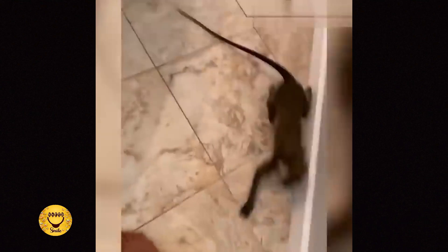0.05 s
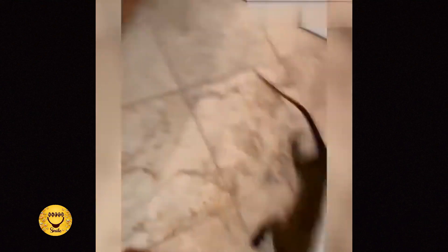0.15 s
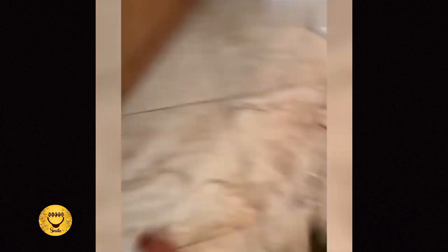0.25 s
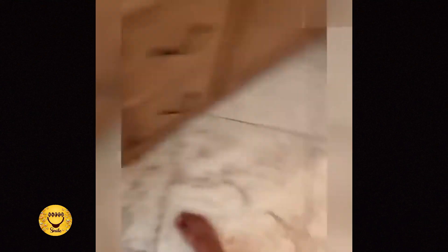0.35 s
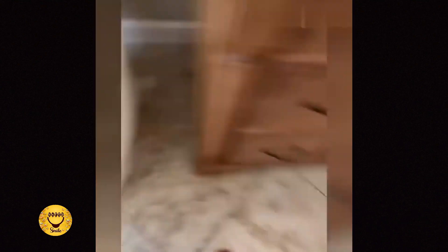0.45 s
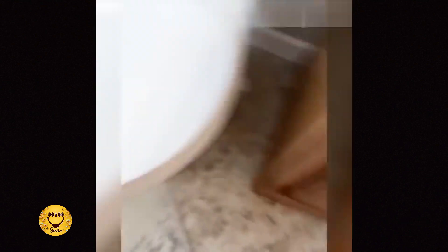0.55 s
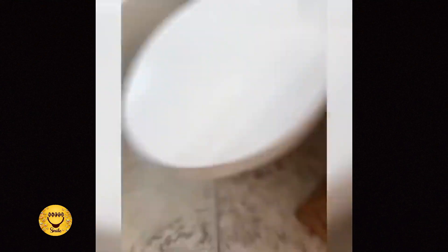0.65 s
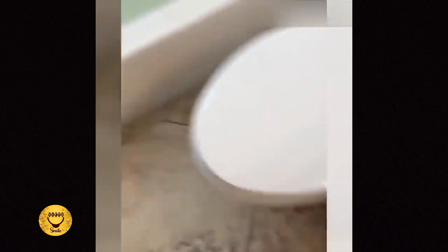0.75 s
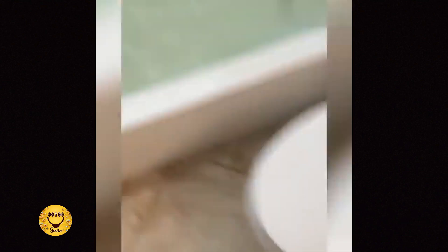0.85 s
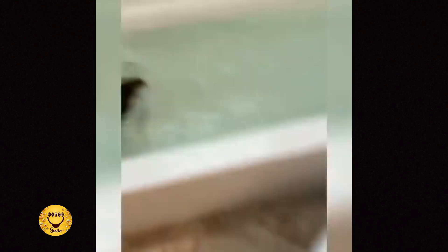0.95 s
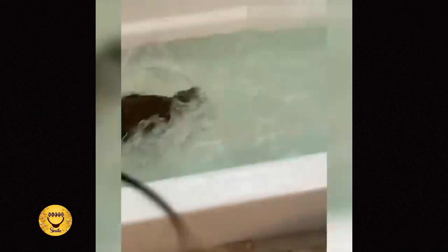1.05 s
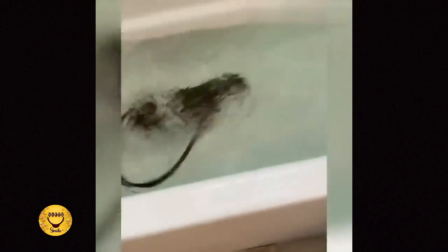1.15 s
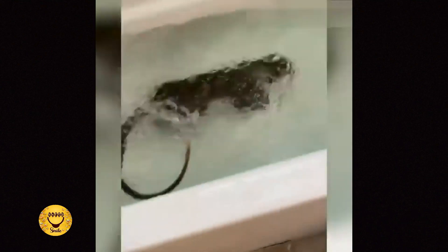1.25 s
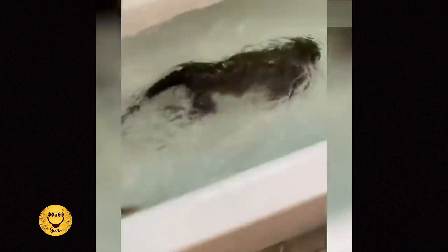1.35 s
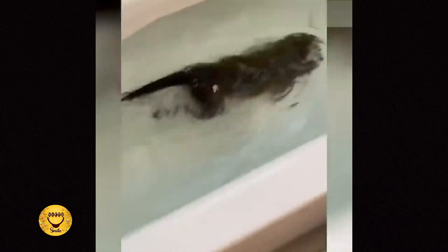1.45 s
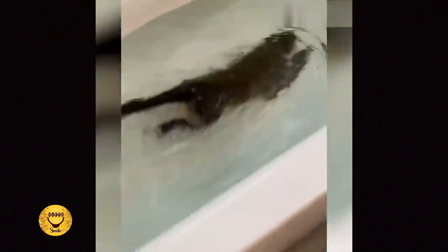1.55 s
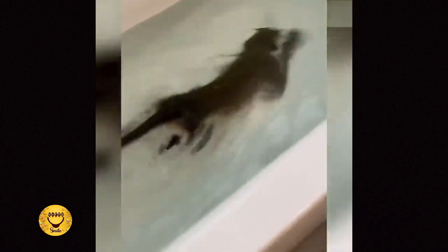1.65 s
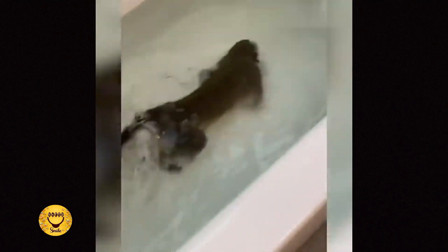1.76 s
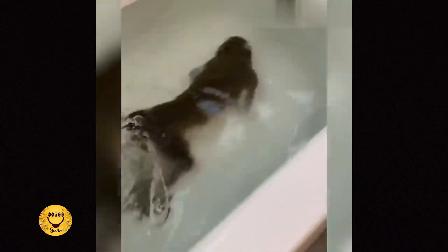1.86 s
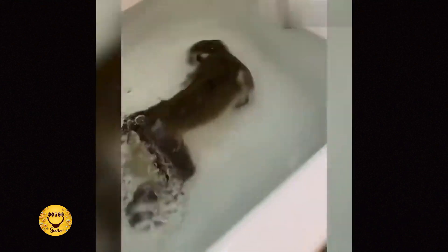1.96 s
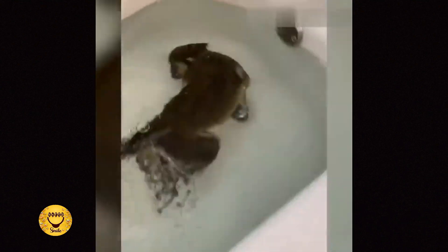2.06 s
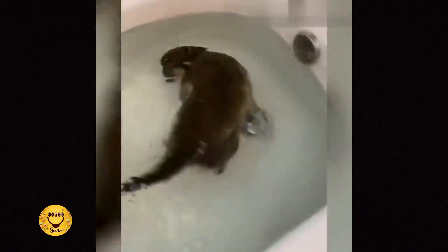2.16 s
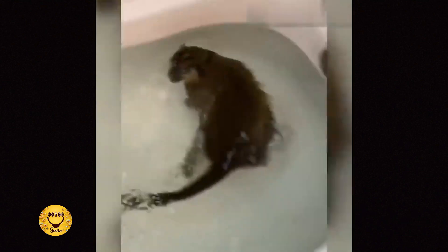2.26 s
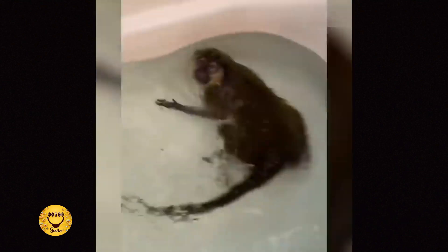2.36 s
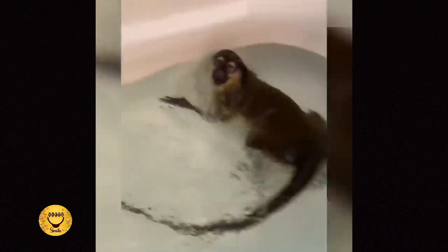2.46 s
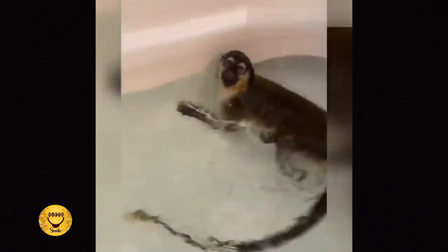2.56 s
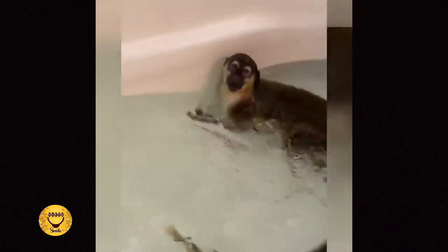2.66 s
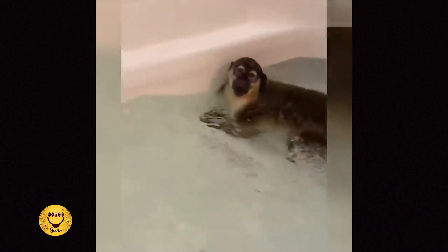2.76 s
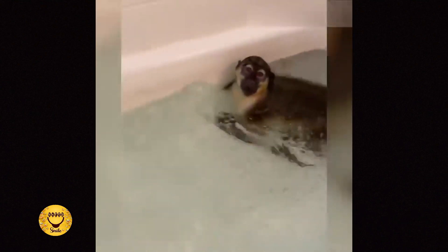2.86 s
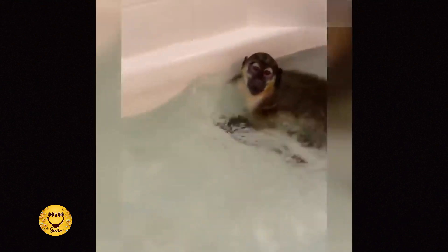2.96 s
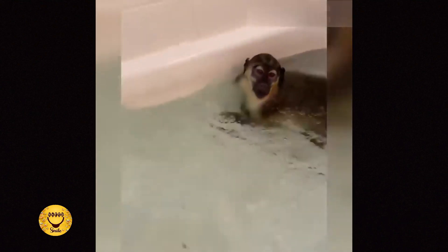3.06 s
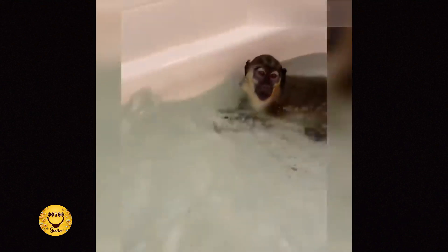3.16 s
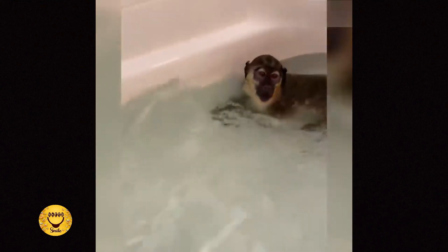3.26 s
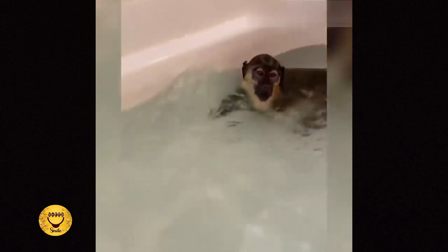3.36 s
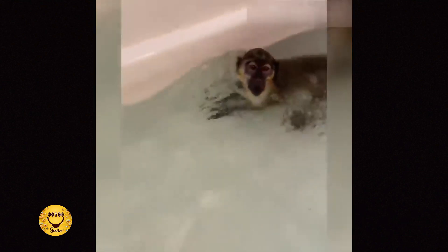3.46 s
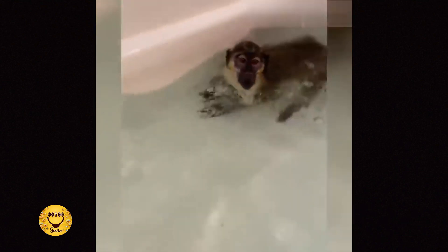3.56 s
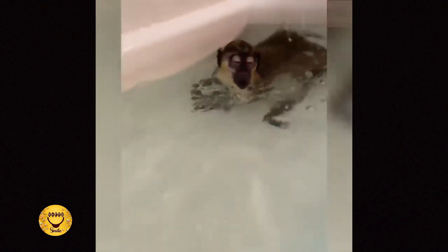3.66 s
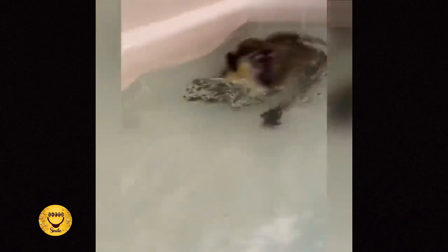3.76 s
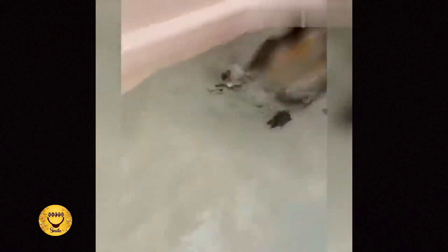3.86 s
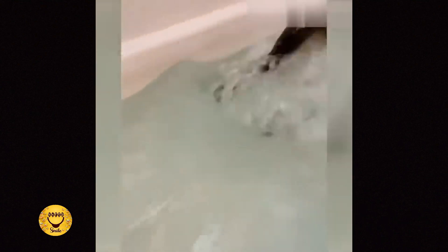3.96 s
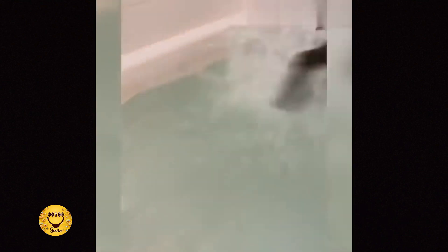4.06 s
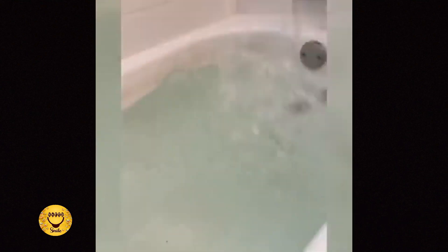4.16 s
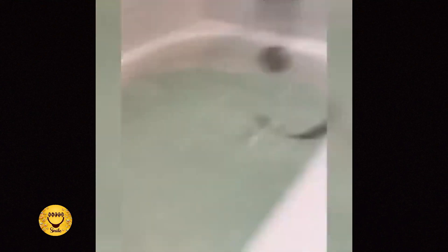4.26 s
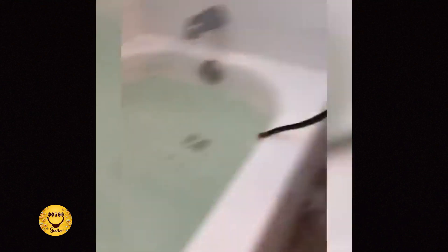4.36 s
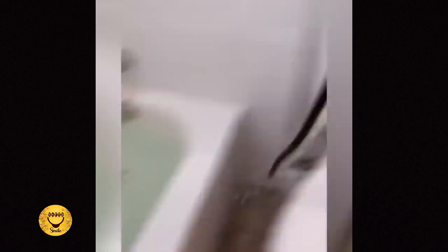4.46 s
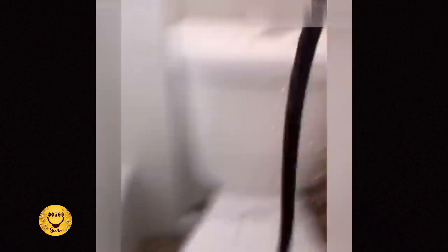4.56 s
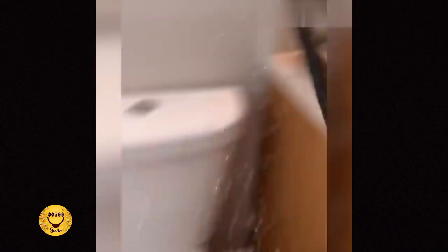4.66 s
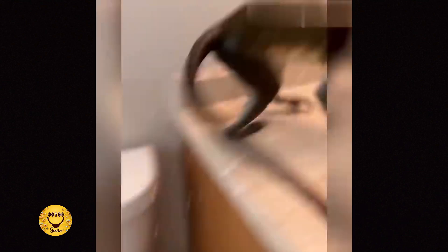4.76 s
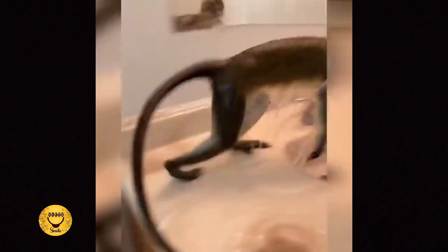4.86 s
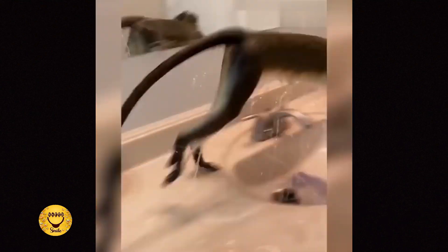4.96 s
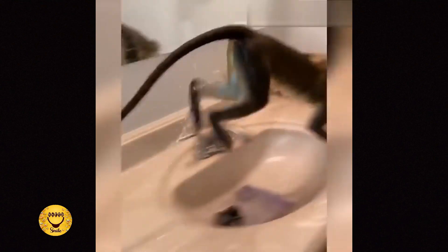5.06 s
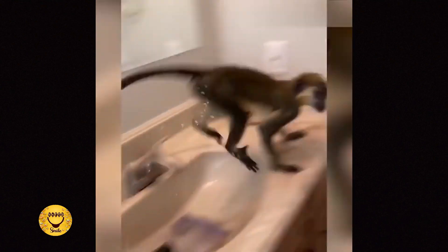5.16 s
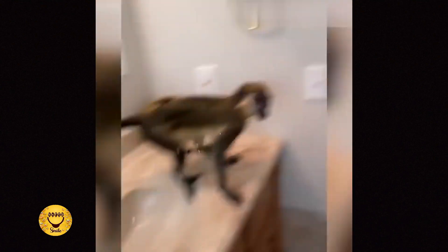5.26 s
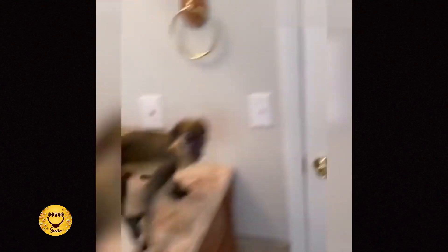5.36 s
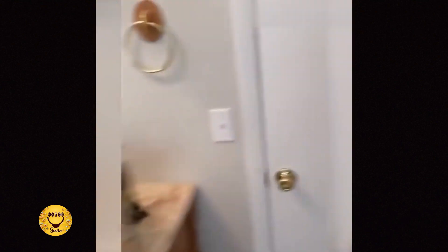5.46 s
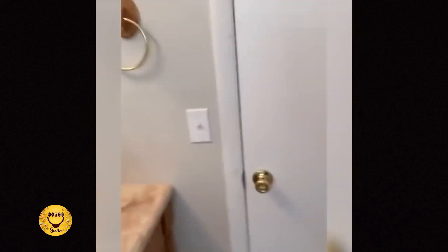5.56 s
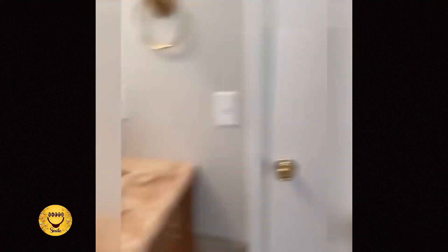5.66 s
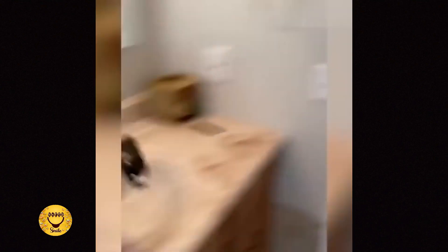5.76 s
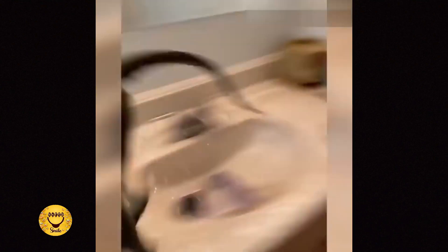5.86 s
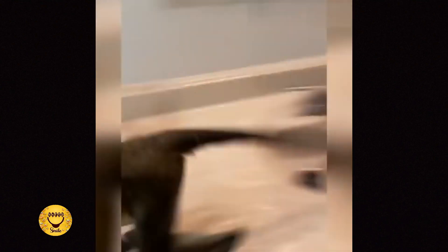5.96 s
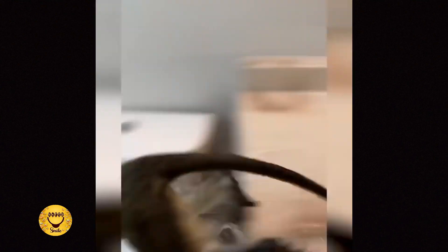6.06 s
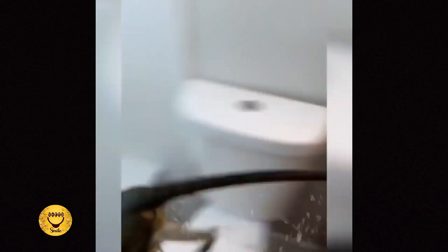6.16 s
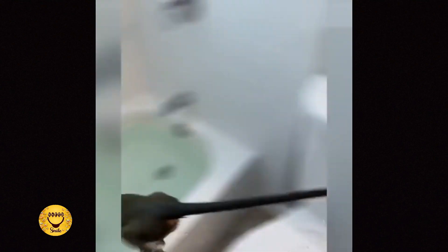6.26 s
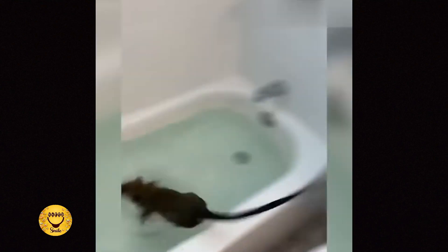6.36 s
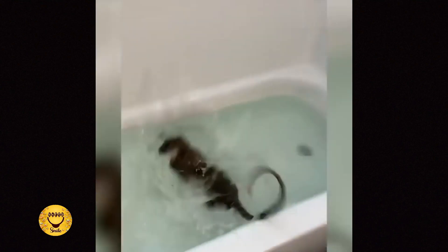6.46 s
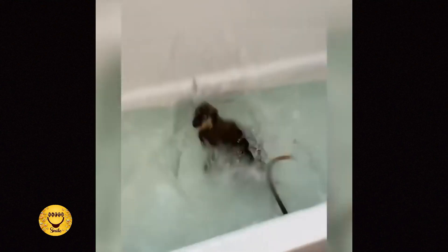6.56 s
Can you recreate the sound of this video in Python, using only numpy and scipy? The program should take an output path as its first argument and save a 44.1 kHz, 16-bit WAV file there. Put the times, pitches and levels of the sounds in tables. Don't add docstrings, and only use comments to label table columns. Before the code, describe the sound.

A small animal plunges into a full bathtub, paddles with quiet plops and drips, then splashes out, thuds across a counter and dives back in.

```python
import sys
import numpy as np
from scipy import signal
from scipy.fft import rfft, irfft, next_fast_len
from scipy.io import wavfile
from scipy.ndimage import uniform_filter1d

SR = 44100
rng = np.random.default_rng(int(sys.argv[2]) if len(sys.argv) > 2 else 0)


def boost(x):
    u = np.asarray(x, float) / 20
    return 10 ** u


def dump(signal):
    limited = np.clip(np.atleast_2d(signal).T, -1, 1)
    pcm = np.round(limited * 32767).astype(np.int16)
    wavfile.write(sys.argv[1], SR, pcm)


N = 291967

# start_s, spray_db, splash_db, slosh_db, boom_db
WATER_LEVELS = [(0.0, -40, -51, -51.5, -48), (0.28, -53, -65, -64.5, -66.5), (0.33, -54, -63, -70, -61),
                (0.39, -48, -65.5, -58, -59), (0.59, -55.5, -60, -69, -66), (0.66, -55, -61.5, -50, -41.5),
                (0.74, -48, -47.5, -44.5, -47), (0.81, -42, -51, -56, -43), (0.83, -36.5, -35, -59, -50.5),
                (0.88, -27, -33.5, -39, -40), (1.07, -29, -26.5, -23.5, -37), (1.1, -31.5, -27, -26.5, -31),
                (1.12, -32.5, -34, -29.5, -32), (1.31, -34, -35, -39.5, -43),
                (1.51, -35, -37, -34.5, -42.5), (1.69, -36.5, -37, -38.5, -49),
                (1.71, -30.5, -37, -43, -49), (1.75, -37, -39.5, -37, -46.5),
                (1.97, -40.5, -43.5, -46, -60.5), (2.1, -43.5, -44, -43, -66), (2.14, -47.5, -51, -43, -62),
                (2.34, -53.5, -57, -52.5, -52.5), (2.45, -51, -54.5, -51, -66),
                (2.51, -50.5, -49, -40, -50), (2.75, -54, -57, -60.5, -68),
                (2.84, -57, -58.5, -73.5, -74.5), (3.08, -54, -65.5, -82, -72),
                (3.11, -53, -85.5, -115, -84), (3.19, -59.5, -63, -93, -72), (3.26, -58, -73, -97, -72),
                (3.3, -50, -67, -88, -72), (3.32, -50, -64, -75, -64), (3.61, -58.5, -69.5, -70, -65),
                (3.7, -55, -64.5, -64, -60.5), (3.89, -47, -52, -58, -55), (3.93, -29, -30, -58, -55),
                (4.0, -33.5, -29, -32, -49), (4.2, -26.5, -35.5, -39.5, -45.5), (4.24, -27, -38, -36, -46),
                (4.28, -27.5, -30.5, -35, -29), (4.33, -25.5, -30.5, -30.5, -37),
                (4.41, -29.5, -34.5, -35.5, -29), (4.52, -30, -38.5, -40, -41.5),
                (4.55, -32, -45, -44, -33), (4.64, -35.5, -42, -44, -51), (4.68, -36, -45.5, -51, -32),
                (4.72, -41, -48, -47, -48.5), (4.79, -31.5, -54, -53, -48), (4.85, -33.5, -53.5, -53, -58),
                (5.0, -40.5, -55, -61, -56), (5.02, -35, -59, -54, -67), (5.11, -41.5, -47, -55, -47),
                (5.12, -40.5, -50.5, -52, -48), (5.2, -44.5, -54, -57, -59), (5.24, -39, -53, -45.5, -34),
                (5.29, -40, -64, -48, -45), (5.42, -46, -55, -55.5, -37), (5.7, -51, -57.5, -46, -53),
                (5.84, -52, -59, -54, -58), (5.86, -50, -46, -46, -64), (5.92, -45, -46, -48, -44),
                (6.01, -43, -60, -48, -50), (6.12, -45, -55, -56.5, -56.5), (6.32, -50, -60, -54, -47.5),
                (6.36, -33, -53, -54, -42), (6.38, -32.5, -44, -49, -59), (6.4, -25.5, -24, -32, -30),
                (6.43, -27.5, -22.5, -25.5, -22.5), (6.51, -34, -33, -27.5, -21),
                (6.62, -35, -35, -31, -28.5)]
# freq_hz, level_db
SPRAY_COLOUR = [(900, -41), (1500, -23), (2100, -3.5), (2600, -1), (3400, -3.5), (6100, -3.5), (6900, -6),
                (7600, -14.5), (8300, -28.5), (9000, -62)]
SPLASH_COLOUR = [(500, -67), (850, 1), (1200, -1.5), (1700, 1.5), (2200, -4.5), (3200, -45.5)]
SLOSH_COLOUR = [(200, -72), (340, 2), (450, 2), (800, 4), (1000, -15), (1500, -24)]
BOOM_COLOUR = [(80, -33), (140, -1.5), (230, -4.5), (320, 2), (480, -34)]
# freq_hz, width_hz, level_db
TUB_MODES = [(162.5, 34, -6), (228.4, 18.7, 5), (281.4, 6, -0.5), (385.3, 11.1, 0.5), (460.2, 8.3, 1),
             (611.7, 18, -4), (786, 10, -6.5), (1192, 13, -6.5), (1737, 17, -9.5)]
# start_s, level_db
RUMBLE_LEVELS = [(0.0, -61.5), (0.29, -61.5), (0.5, -58), (0.59, -67), (0.64, -48.5), (0.96, -38),
                 (1.07, -45.5), (1.14, -35), (1.38, -60.5), (1.53, -48), (1.58, -58.5), (1.66, -45.5),
                 (1.75, -60), (2.65, -54), (2.69, -64), (3.01, -63.5), (3.1, -53.5), (3.24, -66),
                 (3.45, -59), (3.52, -67), (3.61, -55), (3.85, -55.5), (4.07, -45.5), (4.11, -52.5),
                 (4.3, -29.5), (4.39, -42), (4.54, -39.5), (4.57, -27.5), (4.64, -45), (4.77, -28.5),
                 (4.81, -35), (4.87, -70), (4.96, -56), (5.02, -79), (5.09, -50), (5.29, -50),
                 (5.33, -50.5), (5.48, -68.5), (5.64, -43.5), (5.79, -57), (5.86, -44), (5.92, -60),
                 (5.97, -31), (6.09, -48.5), (6.14, -50), (6.23, -45), (6.36, -50.5), (6.47, -29),
                 (6.56, -59), (6.62, -29)]
# freq_hz, level_db
SHAKE_COLOUR = [(15, -38), (30, -18), (65, 2), (120, -5), (190, -27.5)]
# start_s, hiss_db, low_whistle_db, high_whistle_db
TOP_LEVELS = [(0.0, -63, -43, -69), (0.31, -75.5, -101, -87), (0.39, -57, -60, -65), (0.51, -75, -74, -82),
              (0.87, -52.5, -63, -53), (0.92, -49, -114, -66), (0.98, -50.5, -113, -61),
              (1.07, -53, -49.5, -61), (1.51, -62.5, -61, -82), (1.56, -64, -100, -72),
              (1.66, -62, -63, -73), (1.9, -57, -62, -72), (2.17, -74, -80, -75), (2.67, -71, -65, -83),
              (2.75, -74, -109, -89), (2.89, -72.5, -62, -74), (3.37, -75, -72, -77),
              (3.5, -81, -123, -85), (3.85, -70.5, -55, -88), (3.95, -49, -70, -66),
              (4.02, -87, -125, -76), (4.07, -50, -66, -72), (4.13, -50.5, -47, -58),
              (4.24, -49, -64, -53), (4.28, -48, -115, -57), (4.33, -45, -61, -65),
              (4.59, -54.5, -63, -69), (4.66, -59, -123, -79), (4.74, -59, -69, -66),
              (4.81, -50, -114, -57), (4.89, -49, -49.5, -58), (4.94, -60, -72, -71),
              (4.98, -50, -123, -65), (5.07, -86, -125, -64), (5.24, -48, -76, -74),
              (5.29, -53, -125, -58), (5.53, -73, -115, -92), (5.6, -59, -61, -82), (5.81, -74, -81, -75),
              (5.86, -56.5, -53.5, -73), (6.21, -68.5, -60.5, -80), (6.42, -44, -40.5, -46),
              (6.62, -62.5, -69, -77)]
# freq_hz, level_db
HISS_COLOUR = [(5590, -33), (9500, -70), (10100, -43.5), (10900, -2.5), (11500, 23.5), (12600, 30),
               (14700, 18.5), (15600, 24), (16000, -49.5)]
# start_s, share (0 to 1)
PATCH_SHARE = [(0, 1), (.8, 1), (.88, .37), (1.95, .37), (2.02, 1), (3.25, 1), (3.33, .25), (3.68, .25),
               (3.74, 1), (3.9, 1), (3.95, .4), (4.18, .5), (4.25, .15), (4.7, .14), (4.9, .04), (5.8, .1),
               (5.88, .7), (6.3, .9), (6.4, .37)]
# freq_hz, level_db
WHISTLES = [
    [(7752, -7.5), (8441, -8)],
    [(11886, 0), (12600, -12), (13954, 6), (15332, 16)],
]
# start_s, peak_db, t60_s
SLAPS = [(.385, -41, 0.04), (.74, -29.5, 0.054), (1.099, -8.5, 0.049), (2.63, -32.5, 0.046),
         (3.712, -32.5, 0.028), (3.929, -8.5, 0.024), (4.73, -23, .05), (5.232, -29, 0.062),
         (5.859, -21, .04), (5.983, -23, 0.049), (6.25, -28, 0.037), (6.345, -26, 0.099),
         (6.396, -6.5, 0.048)]
# start_s, peak_db, pitch_hz, t60_s
THUDS = [(0.64, -25.5, 222, 0.11), (0.837, -13.5, 151, 0.14), (1.116, -24, 76.5, 0.23),
         (3.594, -38, 99, 0.13), (4.17, -23, 187, 0.16), (4.266, -35, 93, 0.08), (4.544, -14, 120, 0.1),
         (4.771, -21, 55, 0.21), (5.07, -26.5, 70.0, 0.12), (5.248, -27, 145, 0.12),
         (5.618, -28, 113, 0.17), (5.962, -36, 73, 0.12), (6.215, -15, 62.5, 0.083),
         (6.421, -10, 240.4, 0.16)]
# start_s, peak_db, pitch_hz, t60_s
PLOPS = [(.667, -25, 308, 0.37), (.75, -30, 712, 0.12), (.83, -18, 396, 0.13), (.87, -22, 1182, 0.15),
         (.989, -12.5, 357, .14), (1.049, -22, 580, .08), (1.2, -26.5, 475, 0.24),
         (1.72, -28.5, 396.6, 0.47), (1.87, -27, 466, 0.13), (2.06, -25.5, 389.4, 0.23),
         (2.253, -24.5, 648, 0.084), (2.253, -24.5, 849, 0.099), (2.46, -37, 462, 0.41),
         (2.497, -34, 1200, 0.057), (2.528, -23.5, 1220, 0.047), (2.55, -31.5, 737, 0.1),
         (2.62, -31.5, 1465, .05), (2.8, -42, 1640, 0.12), (3.71, -33, 708, 0.029),
         (3.928, -10.5, 715, 0.033), (3.968, -17.5, 1290, 0.15), (3.983, -8.5, 820, 0.036),
         (4.35, -21, 1155, 0.22), (4.484, -17.5, 1333, 0.047), (5.122, -25, 371, 0.17),
         (5.23, -33, 1610, 0.046), (5.269, -23.5, 222, 0.17), (5.52, -35, 288, 0.13),
         (5.62, -27, 350, 0.077), (5.655, -35.5, 692, 0.089), (5.87, -29.5, 724, 0.12),
         (6.06, -33, 1310, .08)]
# start_s, peak_db, t60_s
FLICKS = [
    (0.7358, -45, 0.099),
    (1.898, -59, 0.079),
    (3.2894, -60, 0.05),
    (3.711, -53, 0.043),
    (5.22, -58.5, 0.057),
    (5.8576, -40, 0.044),
]
# start_s, peak_db, t60_s
CLICKS = [
    (.8335, -20, .012),
    (1.704, -23, .02),
    (2.529, -33, .012),
    (3.915, -27, .02),
    (5.014, -27, .01),
    (6.25, -34, .02),
]
# start_s, peak_db, centre_hz, t60_s
PUFFS = [
    (2.125, -29, 4685, 0.14),
    (3.28, -41, 2700, 0.22),
    (3.74, -45, 3190, 0.32),
    (5.02, -29, 2795, .15),
]
# start_s, peak_db, pitch_hz, t60_s
DRIPS = [
    (2.51, -33, 3630, 0.064),
    (2.528, -30.5, 2780, 0.057),
    (3.279, -38.5, 2350, 0.094),
    (3.286, -29.5, 2834, 0.069),
    (3.297, -24.5, 3555, 0.043),
    (3.77, -43, 3310, 0.088),
    (3.885, -43, 1690, .04),
    (4.33, -19, 2880, 0.081),
]
# freq_hz, t60_s
TILES_DECAY = [(100, 0.45), (800, 0.72), (3000, 0.66), (10000, 0.1)]
# freq_hz, side_minus_mid_db
PORT_DIFFERENCE = [(40, -31), (80, -26), (180, -20), (380, -9.5), (700, 1.5), (1290, 5), (2380, -5.5),
                   (4400, -4.5), (6700, -11), (7300, -1), (8200, -17)]
# freq_hz, share (0 to 1)
LEFT_LEAN = [(150, 0), (500, 0.087), (1200, 0.19), (2500, 0)]


def unit(x):
    return x / np.sqrt(np.mean(x ** 2) + 1e-20)


def along(points, hz):
    f, v = np.transpose(points)
    return np.interp(np.log(hz + 1), np.log(f + 1), v)


def curves(rows):
    s, *columns = np.transpose(rows)
    return [np.interp(np.arange(N) / SR, s, c) for c in columns]


def filtered(x, response):
    m = next_fast_len(N + SR // 2)
    return irfft(rfft(x, m) * response(np.fft.rfftfreq(m, 1 / SR)), m)[..., :N]


def colour(x, points):
    low, high = points[0][0], points[-1][0]
    return unit(filtered(x, lambda hz: boost(along(points, hz)) * (hz > low) * (hz < high)))


def patchy(patchy_db):
    z = signal.stft(rng.standard_normal(N), nperseg=512)[2]
    field = uniform_filter1d(rng.standard_normal(z.shape), size=5, axis=0)
    field = uniform_filter1d(field, size=16, axis=1)
    return unit(signal.istft(z * boost(patchy_db * unit(field)), nperseg=512)[1][:N])


def bubbles(count, size, hz, octaves, cycles, rise, spread_db):
    draw = rng.random((count, 2))
    pitch = hz * 2 ** (octaves * rng.standard_normal((count, 1)))
    turns = pitch * np.arange(size) / SR
    age = turns / cycles
    ring = np.sin(2 * np.pi * turns * (1 + rise * np.minimum(age, 3)))
    ring *= np.exp(-3 * age) * (1 - np.exp(-turns))
    ring *= boost(spread_db * draw[:, :1]) * np.hanning(2 * size)[size:]
    at = (draw[:, 1:] * N).astype(int) + np.arange(size)
    return unit(np.bincount(at.ravel(), ring.ravel(), N)[:N])


def tail(length, scale):
    hz, t, z = signal.stft(rng.standard_normal(length), SR, nperseg=256)
    t60 = scale * along(TILES_DECAY, hz)[:, None]
    echo = signal.istft(z * boost(-60 * t / t60), SR, nperseg=256)[1]
    return echo / np.linalg.norm(echo)


def struck(rows, sound, wet_db):
    out, t = np.zeros(N + SR), np.arange(SR // 6) / SR
    for s, db, *shape in rows:
        direct = boost(db) * sound(t, *shape)
        wet = signal.fftconvolve(direct, tail(SR // 4, scale=1))
        start = round(s * SR)
        out[start:][:len(direct)] += direct
        out[start + 200:][:len(wet)] += boost(wet_db) * wet
    return out[:N]


def tub_walls(f):
    return .5 + sum(boost(db) * 1j * f * w / (c * c - f * f + 1j * f * w) for c, w, db in TUB_MODES)


def water():
    spray_db, splash_db, slosh_db, boom_db = curves(WATER_LEVELS)
    fizz = bubbles(count=4000, size=400, hz=3800, octaves=.6, cycles=30, rise=.012, spread_db=8)
    chatter = bubbles(count=1200, size=1000, hz=1350, octaves=.45, cycles=35, rise=.03, spread_db=6)
    gurgle = bubbles(count=800, size=1600, hz=560, octaves=.5, cycles=35, rise=.03, spread_db=6)
    spray = colour(patchy(patchy_db=2.5) + 0.27 * fizz, SPRAY_COLOUR)
    splash = colour(filtered(patchy(patchy_db=1.3) + .35 * chatter, tub_walls), SPLASH_COLOUR)
    slosh = colour(filtered(patchy(patchy_db=1.2) + .3 * gurgle, tub_walls), SLOSH_COLOUR)
    boom = colour(filtered(patchy(patchy_db=1.5), tub_walls), BOOM_COLOUR)
    return boost(spray_db) * spray + boost(splash_db) * splash + boost(slosh_db) * slosh + boost(boom_db) * boom


def rumble():
    return boost(curves(RUMBLE_LEVELS)[0]) * colour(patchy(patchy_db=1.0), SHAKE_COLOUR)


def whistle(lines):
    def comb(f):
        return sum(boost(db) * np.exp(-((f - hz) / 14) ** 2) for hz, db in lines)
    return unit(filtered(rng.standard_normal(N), comb))


def top_hiss():
    hiss_db, low_db, high_db = curves(TOP_LEVELS)
    hz, t, z = signal.stft(rng.standard_normal((2, N)), SR, nperseg=2048)
    luck = rng.random((2, len(hz) // 16 + 1, len(t) // 2 + 1))
    luck = luck.repeat(16, 1).repeat(2, 2)[:, :len(hz), :len(t)]
    luck *= 1 - .8 * np.exp(-((hz[:, None] - 12600) / 500) ** 4)
    share = np.interp(t, *np.transpose(PATCH_SHARE))
    side_share = .7 * share * (share < .6)
    alive = luck < np.array([share, side_share])[:, None]
    hiss = colour(signal.istft(z * alive, nperseg=2048)[1][:, :N], HISS_COLOUR)

    flicker = np.interp(np.arange(N) / SR, t, luck[0, 0] < .7)
    sparse = np.clip((.36 - curves(PATCH_SHARE)[0]) / .1, 0, 1)
    low = flicker * boost(low_db) * whistle(WHISTLES[0])
    high = sparse * boost(high_db + 9) * whistle(WHISTLES[1])
    ticks = filtered(struck(FLICKS, slap, wet_db=-31), lambda f: (f > 7800) * (f < 15900))
    return boost(hiss_db + 2) * hiss + np.array([[1], [.1]]) * (low + high + boost(15) * ticks)


def slap(t, t60):
    return 0.49 * rng.standard_normal(len(t)) * boost(-60 * t / t60) * (1 - np.exp(-t / 0.00072))


def thud(t, hz, t60):
    return np.sin(2 * np.pi * hz * t) * boost(-60 * t / t60) * (1 - np.exp(-t / 0.005))


def plop(t, hz, t60):
    return np.sin(2 * np.pi * hz * t * (1 + 0.02 * t / t60)) * boost(-60 * t / t60) * (1 - np.exp(-t / 0.0005))


def puff(t, hz, t60):
    swarm = unit(np.convolve(rng.standard_normal(len(t)), np.hanning(50), 'same'))
    return swarm * np.sin(2 * np.pi * hz * t) * boost(-60 * t / t60) * (1 - np.exp(-t / 0.0039))


def wet_brightness(hz):
    return (boost(along(SPRAY_COLOUR, hz)) + 0.75 * boost(along(SPLASH_COLOUR, hz)) + .02) * (hz < 8000)


def paws():
    clicks = boost(13) * struck(CLICKS, slap, wet_db=-9)
    slaps = filtered(boost(12) * struck(SLAPS, slap, wet_db=0) + clicks, wet_brightness)
    thuds = struck(THUDS, thud, wet_db=-8)
    plops = struck(PLOPS, plop, wet_db=-6)
    drops = struck(DRIPS, plop, wet_db=-5.5) + struck(PUFFS, puff, wet_db=1)
    return slaps + thuds + plops + drops


def scene():
    mid = boost(-2.5) * water() + boost(-8.5) * paws() + rumble()
    z = signal.stft(mid, nperseg=1024)[2]
    paths = rng.random((len(z), z.shape[1] // 6 + 1)).repeat(6, 1)[:, :z.shape[1]]
    scattered = signal.istft(z * np.exp(2j * np.pi * paths), nperseg=1024)[1]
    scattered = np.pad(scattered, (400, 0))[:N]
    side = filtered(scattered, lambda hz: boost(along(PORT_DIFFERENCE, hz) + 2.5))
    side = side + filtered(mid, lambda hz: along(LEFT_LEAN, hz))
    mid, side = np.array([mid, side]) + top_hiss()
    return np.array([mid + side, mid - side])


def top_cut(x):
    return signal.sosfilt(signal.butter(12, 16310, fs=SR, output="sos"), x)


def record(dry):
    gate_db = -92.5
    hz, _, z = signal.stft(dry, SR, nperseg=2048)
    power = uniform_filter1d(np.abs(z.mean(0)) ** 2, size=7, axis=0)
    power = uniform_filter1d(power, size=3, axis=1)
    low_mid = ((hz > 380) & (hz < 1500))[:, None]
    faint = (power < boost(gate_db) ** 2) & low_mid
    gated = signal.istft(z * ~faint, nperseg=2048)[1][:, :N]
    return top_cut(gated)


dry = scene()
out = record(dry)
dump(out)
```